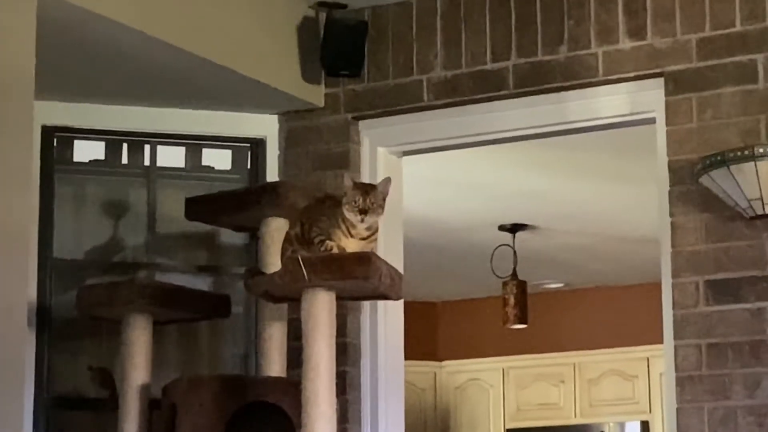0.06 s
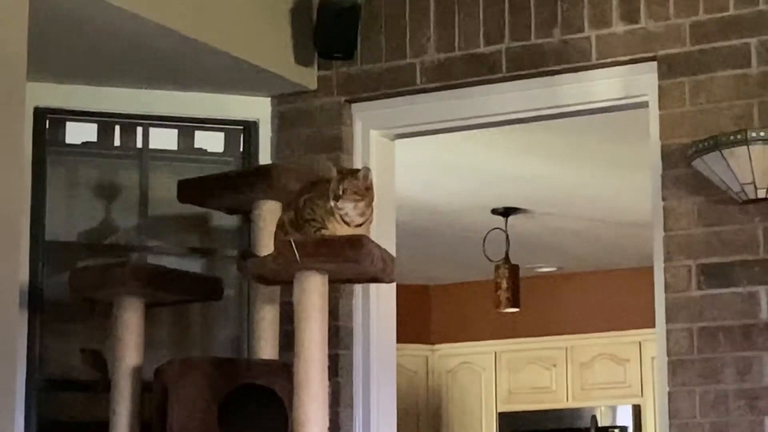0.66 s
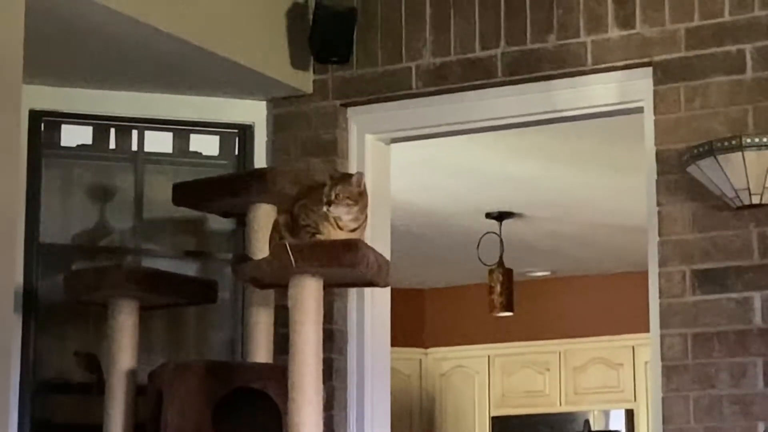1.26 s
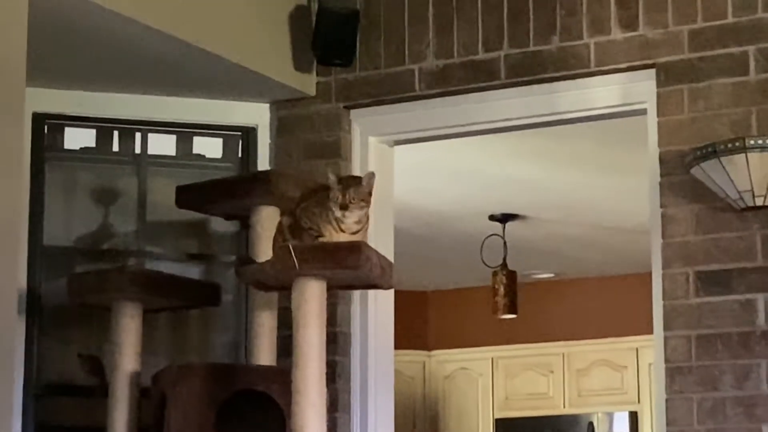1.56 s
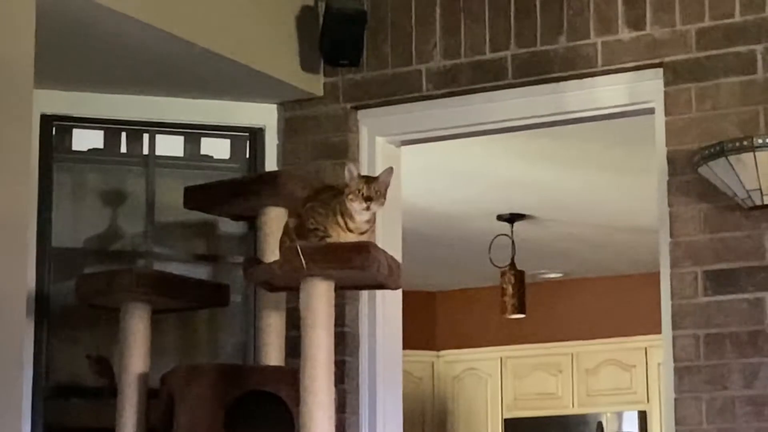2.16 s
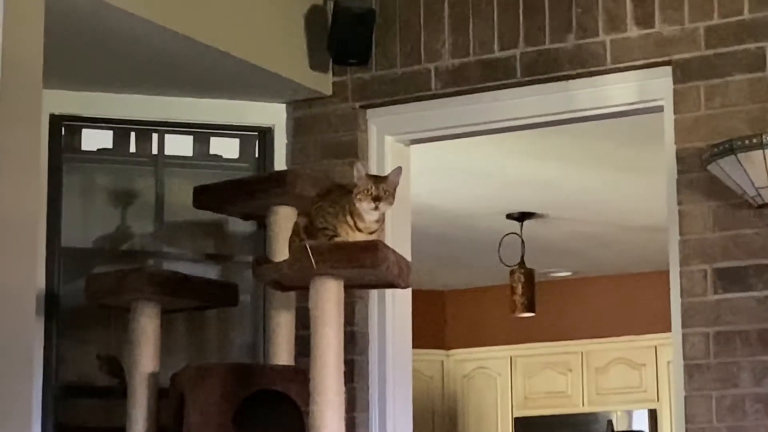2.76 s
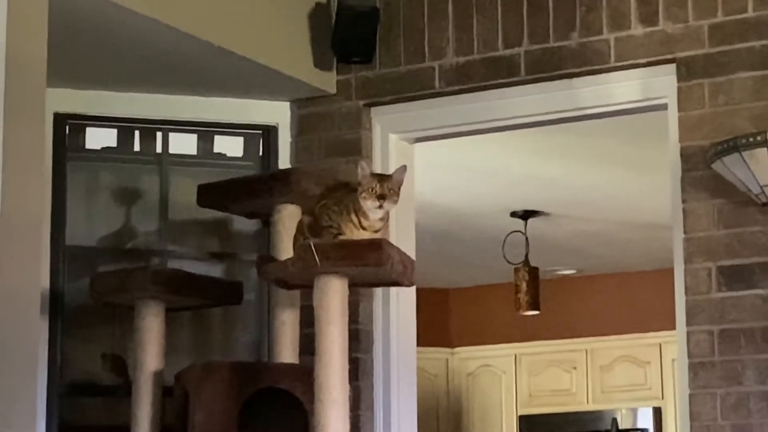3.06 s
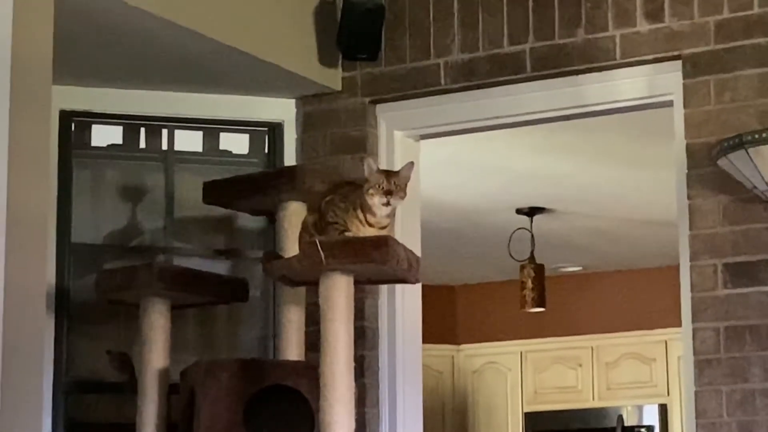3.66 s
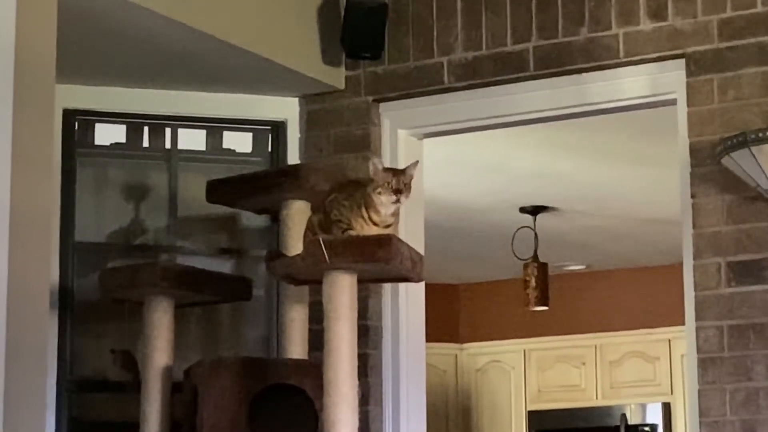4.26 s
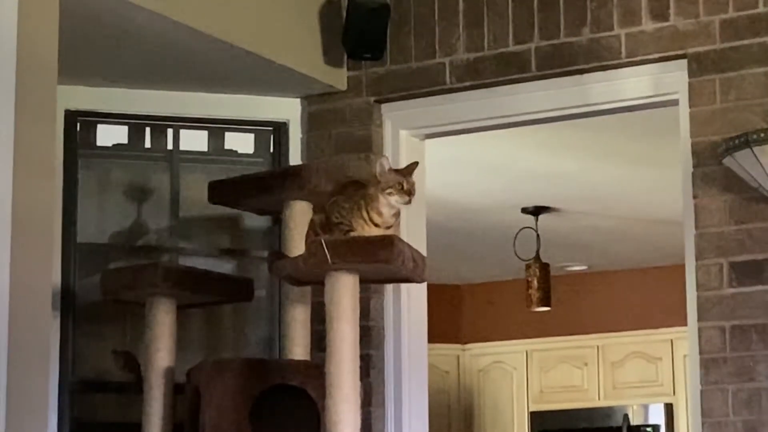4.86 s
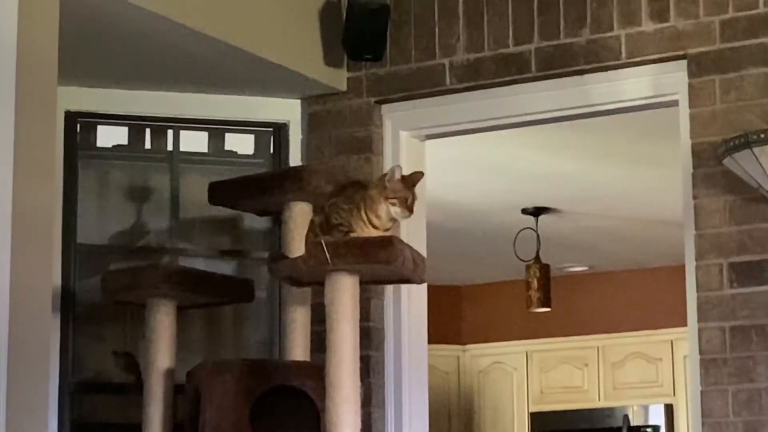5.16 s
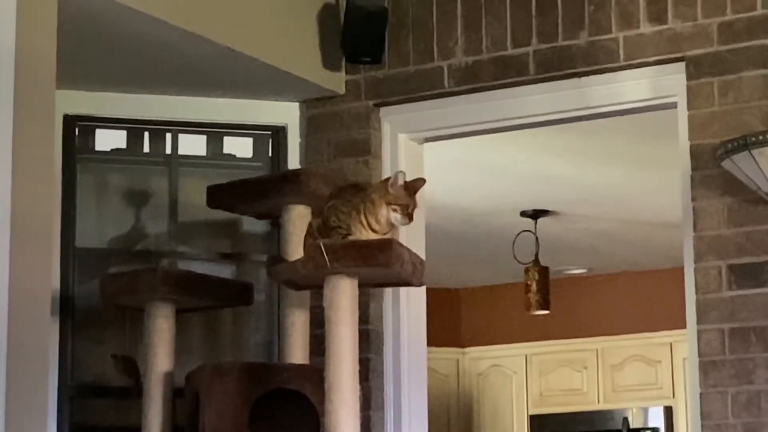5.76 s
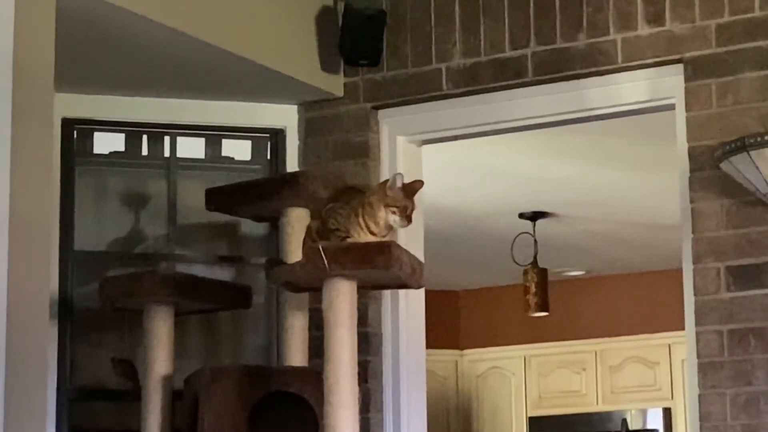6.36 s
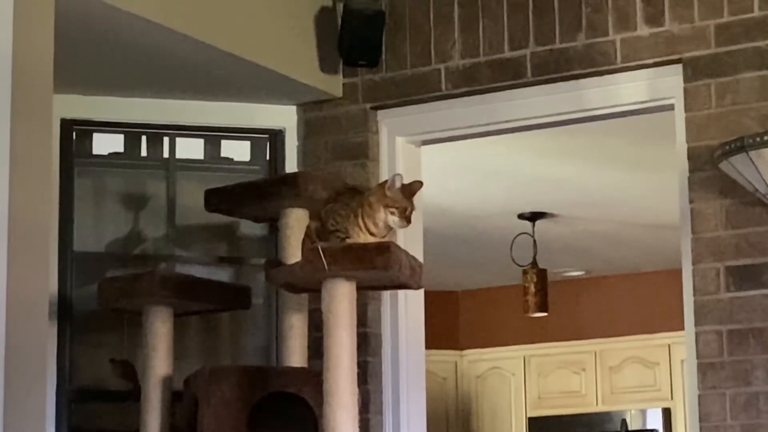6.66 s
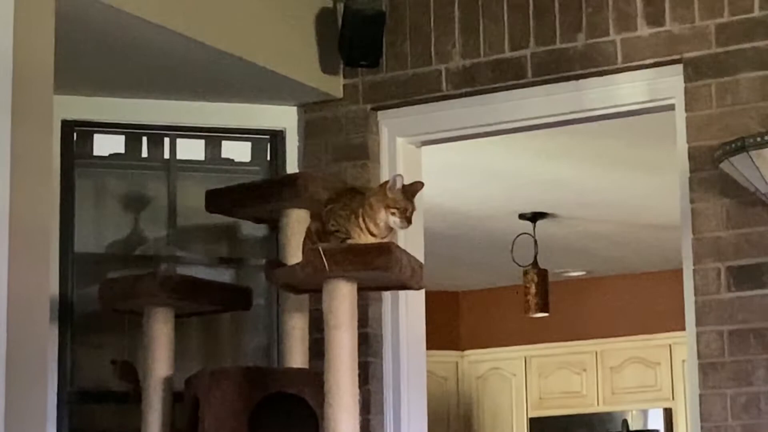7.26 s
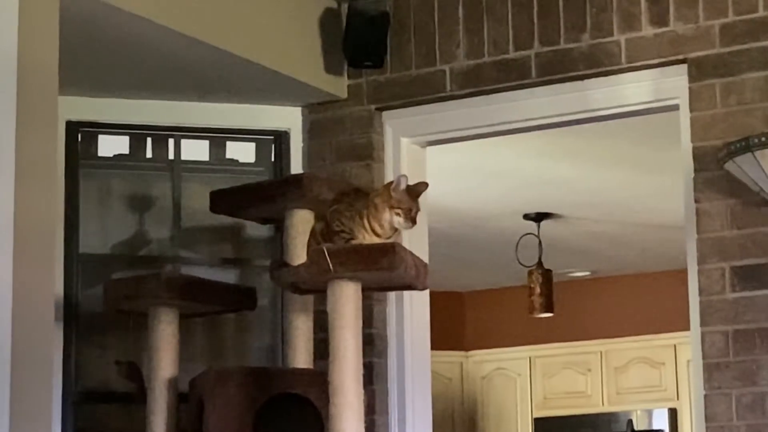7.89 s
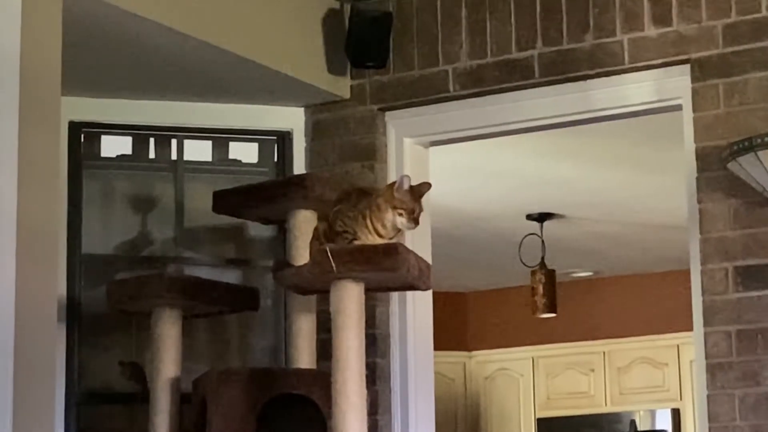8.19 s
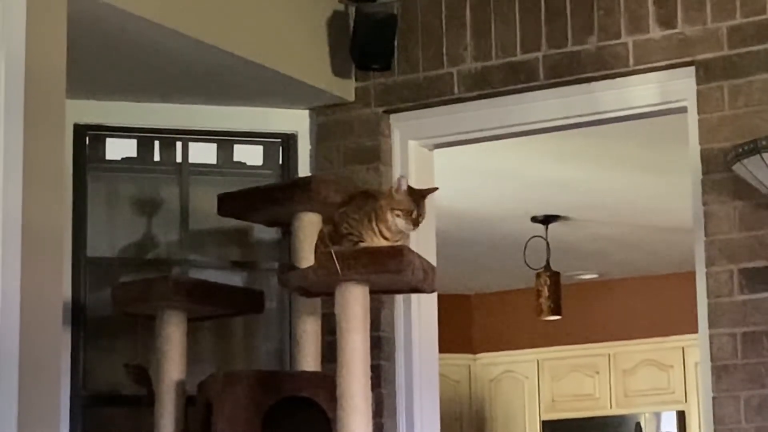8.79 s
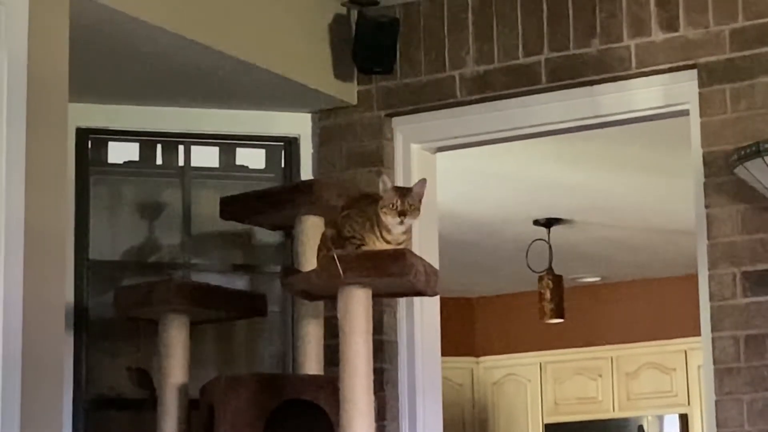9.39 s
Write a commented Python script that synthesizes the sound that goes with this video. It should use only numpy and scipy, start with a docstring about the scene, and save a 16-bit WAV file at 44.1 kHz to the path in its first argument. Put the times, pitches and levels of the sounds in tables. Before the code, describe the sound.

Five calls from a cat indoors, two faint and thin, three louder and long, over a soft household hum.

```python
"""A cat on a climbing tree calls five times, across a quiet living room from one microphone:
two thin, rising mews, then three full, drawn-out meows, the last with a break in the middle.
Its vocal folds make harmonics, shaped by mouth and throat; a call catches hoarsely, clears and frays.
Brick walls throw the calls back. Under them lie a low household hum and a few faint rustles and ticks."""
import sys
import numpy as np
from scipy import signal
from scipy.fft import rfft, irfft
from scipy.io import wavfile

SR = 44100
rng = np.random.default_rng(int(sys.argv[2]) if len(sys.argv) > 2 else 0)


def wav_out(sig):
    """Save sig, one row per channel (or a flat mono array), as 16-bit PCM at SR to the path in sys.argv[1]."""
    wavfile.write(sys.argv[1], SR, np.round(np.clip(np.atleast_2d(sig).T, -1, 1) * 32767).astype(np.int16))


N = 420273


def gain_of(db):
    """Decibels to amplitude."""
    return 10 ** (np.asarray(db) / 20)


def unit_rms(x):
    """Scales to an rms of one."""
    return x / np.sqrt(np.mean(x ** 2) + 1e-20)


def curve_at(points, hz):
    """Reads a curve on a log-frequency axis."""
    f, value = np.transpose(points)
    return np.interp(np.log(hz + 1), np.log(f + 1), value)


def add(mix, start_s, sound):
    """Mixes a sound in at its start time."""
    part = mix[round(start_s * SR):][:len(sound)]
    part += sound[:len(part)]


def band_noise(size, hz, width_hz):
    """Noise in one steep-sided resonance; centred on zero it is a slow wander."""
    f = np.fft.rfftfreq(size, 1 / SR)
    return unit_rms(irfft(rfft(rng.standard_normal(size)) / (1 + (2 * (f - hz) / width_hz) ** 2), size))


def household(air_db=-59.75, low_cut_hz=42, top_hz=17000):
    """Room tone at the microphone: steady air noise with three low, wavering hums."""
    # Colour of the air noise. Each row: frequency in Hz, relative level in dB.
    air_colour = [(15, -76.5), (25, -34.5), (41, -20), (69, -2.5), (99, -3), (152, -15), (183, -9),
                  (289, -5), (322, -10), (469, -12), (523, -12), (871, -15.5), (2420, -31), (3630, -30.5),
                  (15500, -41)]
    # The hums. Each row: centre in Hz, width in Hz, level in dB.
    hums = [(64, 9.7, -66.5), (91.6, 15, -73), (270, 34, -71.5)]
    hz = np.fft.rfftfreq(N, 1 / SR)
    band = hz ** 2 / np.hypot(hz ** 2, low_cut_hz ** 2) / np.hypot(1, (hz / top_hz) ** 2)
    colour = gain_of(curve_at(air_colour, hz)) * band
    air = gain_of(air_db) * unit_rms(irfft(rfft(rng.standard_normal(N)) * colour, N))
    return air + sum(gain_of(db) * band_noise(N, centre, width) for centre, width, db in hums)


def rustles(width_hz=950):
    """Faint puffs of noise that swell quickly and fade."""
    # Each row: start in seconds, level in dB, centre in Hz, length in seconds.
    puffs = [(0.206, -64, 3600, 0.067), (2.5, -74.5, 3130, 0.17), (2.634, -68, 4000, 0.041),
             (3.271, -64.5, 4180, 0.059), (3.47, -69.5, 2900, 0.098), (7.632, -62, 3540, 0.039),
             (7.854, -72.5, 4360, 0.12), (9.213, -72.5, 4840, 0.08), (9.315, -71, 4600, 0.027)]
    out = np.zeros(N)
    for start, db, hz, length in puffs:
        size = int(length * SR)
        swell = np.sin(np.pi * np.linspace(0, 1, size) ** 0.54)
        add(out, start, gain_of(db) * band_noise(size, hz, width_hz) * swell)
    return out


def ticks(rise_s=0.0015, decay_s=0.015):
    """Small ticks and taps: broad noise that starts sharply and dies quickly."""
    # Each row: start in seconds, level in dB, centre in Hz.
    taps = [(0.223, -67, 11500), (.96, -68, 12000), (2.258, -66.5, 7700), (2.661, -65, 4000),
            (2.925, -60, 1380), (3.273, -67, 5200), (3.536, -70, 10500), (4.647, -63, 8800),
            (5.569, -70, 7530), (5.66, -72.5, 6730), (5.84, -69.5, 6900), (6.12, -73, 9000),
            (6.281, -71, 9500), (6.326, -68, 8800), (7.379, -63.5, 5230), (9.35, -66, 5200)]
    out = np.zeros(N)
    t = np.arange(SR // 10) / SR
    envelope = np.minimum(t / rise_s, 1) * np.exp(-t / decay_s)
    for start, db, hz in taps:
        add(out, start, gain_of(db) * band_noise(len(t), hz, width_hz=0.66 * hz) * envelope)
    return out


def hoarseness(t, at_start, clear_s, at_end, floor=0.039, fray_s=0.12):
    """Roughness from 0 to 1 over a call: hoarse until the folds catch, then clear, then fraying."""
    catch = at_start / (1 + (t / clear_s) ** 6)
    fray = at_end * np.exp((t - t[-1]) / fray_s)
    return np.clip(floor + catch + fray, 0, 1)


def vowel(order, hz, mouth_hz, width_hz, body_db, tilt_db_per_octave, cut_order=2.9):
    """The mouth resonance rises as the jaw opens, lifting the harmonic it meets, dulling those above."""
    # Colour of every call's low harmonics. Each row: frequency in Hz, gain in dB.
    low_colour = [(500, 1.5), (590, 2.8), (690, 3.8), (760, .5), (880, 0), (1000, 0), (1100, -8),
                  (1240, .2), (1480, 4.5), (1680, 2), (1820, .5), (2030, -.5), (2240, -17), (2370, -6),
                  (2480, 1.5), (2800, 0)]
    harmonic_hz = order * hz
    peak = 1 / (1 + (2 * (harmonic_hz - mouth_hz) / width_hz) ** 2)
    dulling = np.hypot(1, (harmonic_hz / mouth_hz) ** cut_order)
    body = gain_of(body_db + tilt_db_per_octave * np.log2(order)) / dulling
    return np.hypot(peak, body) * gain_of(curve_at(low_colour, harmonic_hz))


def call(course, throat, mouth, hoarse, arch, rasp_db, rasp_slope, skirt_hz, release_s, rise_s=0.0032):
    """The vocal folds make a stack of harmonics; when hoarse, their cycles vary in length and strength."""
    times, *columns = np.transpose(course)
    t = np.arange(times[0], times[-1], 1 / SR)
    size = len(t)
    hz, effort_db, mouth_hz, high_db = (np.interp(t, times, column) for column in columns)
    rough = hoarseness(t - t[0], *hoarse)
    order = np.arange(1, 25)[:, None]
    lower, upper = order[:4], order[4:]
    # The mouth shapes the lowest harmonics; all but the fundamental flutter.
    flutter_db = 1.74 * np.log2(lower) * np.array([band_noise(size, 0, 20) for _ in lower])
    low = gain_of(effort_db + flutter_db) * vowel(lower, hz, mouth_hz, *mouth)
    # The overtones slide through the throat's resonances, which arch scales at start, middle and end.
    stretch = np.polyval(np.polyfit([0, 0.5, 1], arch, 2), np.linspace(0, 1, size))
    flutter_db = 3.5 * np.array([band_noise(size, 0, 30) for _ in upper])
    high = gain_of(curve_at(throat, upper * hz / stretch) + flutter_db)
    high *= gain_of(high_db) / np.linalg.norm(high, axis=0)
    strength = np.vstack([low, high])
    jitter = 0.045 * rough * band_noise(size, 0, 320)
    waver = 0.0033 * band_noise(size, 0, 55)
    cycles = np.cumsum(hz * (1 + jitter + waver)) / SR
    phase = 2 * np.pi * (order * cycles + rng.random(order.shape))
    # Turbulence at the folds spreads a skirt of noise around each harmonic, more around the high ones.
    skirts = np.array([band_noise(size, 0, skirt_hz) for _ in order])
    rasp = gain_of(rasp_db) * np.sqrt(rough) * order ** rasp_slope
    stack = np.sqrt(2) * strength * (np.sin(phase) + rasp * skirts * np.cos(phase)) / np.hypot(1, rasp)
    shimmer = 1 + 0.2 * rough * band_noise(size, 0, 380)
    envelope = np.clip((t - times[0]) / rise_s, 0, 1) * np.clip((times[-1] - t) / release_s, 0, 1)
    out = np.zeros(N)
    add(out, times[0], stack.sum(0) * shimmer * envelope)
    return out


def mews():
    """Two thin, rising calls, airy with turbulence at the folds."""
    # The course of each mew. Each row: time in seconds, pitch in Hz, effort in dB,
    # mouth resonance in Hz, relative level of the overtones in dB.
    first = [(0.29, 502, -57, 410, -81), (0.42, 557, -55, 666, -99), (0.6, 608.7, -52, 920, -75.6),
             (0.76, 666, -55.5, 1360.0, -88), (0.86, 665.5, -43.5, 1730, -81),
             (0.918, 689, -53.6, 1630.0, -80), (0.936, 817, -63, 1957, -81), (0.974, 892, -55, 700.0, -86),
             (1.02, 940, -75, 850.0, -84.6)]
    second = [(3.54, 720, -61, 1430.0, -67), (3.572, 573, -47, 930.0, -77),
              (3.64, 515.0, -45.5, 900.0, -76), (3.71, 552.4, -45, 1070, -76),
              (3.79, 630.6, -43, 1540.0, -68.2), (3.854, 639.8, -41.5, 1690, -66),
              (3.95, 638.2, -45.5, 1480, -65.3), (4.07, 652, -51, 1400, -66.9),
              (4.14, 699, -57, 1745, -68.5), (4.24, 837, -73, 1520.0, -88)]
    # The throat's resonances. Each row: frequency in Hz before the arch, relative level in dB.
    throat = [(2800, -9), (3300, -5), (3900, -14), (4500, 9), (5150, -2), (5800, 16), (6500, -5),
              (8000, -6), (10500, -23), (12500, -12), (14500, -20)]
    airy = dict(rasp_db=-30, rasp_slope=1.7, skirt_hz=750, release_s=0.013)
    out = call(first, throat, mouth=(530, -33, -3.2), hoarse=(0.546, 0.385, 0.31),
               arch=(0.58, 0.56, 0.48), **airy)
    out += call(second, throat, mouth=(636, -44, -2.9), hoarse=(0.51, 0.2, 0.82),
                arch=(0.61, 0.94, 0.81), **airy)
    return gain_of(-1.35) * out


def meows():
    """Three full calls, the jaw opening and closing; the last breaks into two parts."""
    # The course of each meow or part. Each row: time in seconds, pitch in Hz, effort in dB,
    # mouth resonance in Hz, relative level of the overtones in dB.
    first = [(1.255, 523, -47.5, 1150, -79), (1.285, 554, -47, 1070, -73), (1.322, 472, -43.5, 1010, -58),
             (1.347, 506, -32.5, 980, -50), (1.363, 636.4, -38.5, 1510, -61), (1.395, 639, -36, 2050, -58),
             (1.47, 617, -37.5, 2200, -60.5), (1.61, 624.2, -39, 2080, -57),
             (1.69, 603.8, -35, 1274, -53.5), (1.8, 633, -35.5, 924, -62.5), (1.885, 702, -35, 670, -68),
             (1.98, 761, -41.5, 696, -70)]
    second = [(4.65, 768, -39, 1070, -65), (4.68, 740, -26, 1040, -54.5), (4.77, 753, -29.5, 1460, -51.5),
              (4.8, 710, -30.5, 1450, -50), (4.844, 664.3, -31.5, 2540, -53.5),
              (4.92, 638.8, -38, 2004, -57), (5.07, 587.3, -32, 1393, -55), (5.19, 582.7, -31, 1153, -57.5),
              (5.26, 617.7, -32, 820, -71.5), (5.395, 700, -27.5, 678, -67),
              (5.444, 768, -33.5, 954, -71.5), (5.48, 742, -45.5, 670, -72)]
    before_break = [(8.275, 734, -32, 2600, -63), (8.31, 677.5, -27.5, 2170, -46),
                    (8.381, 681, -29.5, 2140, -44.5), (8.42, 644.3, -32, 1420, -47),
                    (8.5, 619.2, -29, 1176, -53), (8.525, 632.5, -27, 1110, -62),
                    (8.552, 543, -30.5, 710, -62)]
    after_break = [(8.582, 684, -25.5, 750, -66), (8.612, 608.3, -29, 1730.0, -50),
                   (8.66, 602.4, -30, 1860, -49), (8.74, 588.2, -34.5, 1800, -53),
                   (8.8, 575, -30.5, 1264, -59.6), (8.86, 580.2, -30, 1177, -60.5),
                   (8.92, 580.5, -31, 940, -68), (9.012, 609.4, -31.5, 785, -73),
                   (9.054, 665.7, -30, 740, -75), (9.1, 666.5, -29.5, 685, -76),
                   (9.19, 685, -43, 600.0, -87)]
    # The throat's resonances in each. Each row: frequency in Hz before the arch, relative level in dB.
    first_throat = [(2700, 12), (3080, -3.5), (3400, 1), (3700, -2.5), (4300, -20), (4950, -13.5),
                    (5550, -12), (6150, -28), (6800, -23), (7400, -17.5), (8100, -33), (12000, -51)]
    second_throat = [(2900, 0.5), (3200, -1.5), (3550, 6), (4100, -9.5), (4600, -20), (5000, -11),
                     (5600, -20), (6400, -34.5), (7050, -17.5), (7800, -25.5), (12000, -42)]
    before_throat = [(3100, 8), (3400, 3.5), (4080, -7.5), (4700, -21.5), (5400, -17), (6120, -18.5),
                     (6700, -41), (7600, -26.5), (8200, -28), (10000, -37), (14000, -47)]
    after_throat = [(3000, 2.5), (3620, -0.5), (4200, -12.5), (4800, -16), (5420, -8.5), (6000, -34),
                    (6650, -21.5), (7700, -23), (8500, -20), (10000, -29), (11500, -43), (14000, -39.5)]
    full = dict(rasp_db=-28, rasp_slope=1.52, skirt_hz=450, release_s=0.0054)
    out = call(first, first_throat, mouth=(456, -3.3, -10.5), hoarse=(0.36, 0.14, 0.3),
               arch=(0.94, 1.028, 1.15), **full)
    out += call(second, second_throat, mouth=(136, -6, -1.5), hoarse=(0.85, 0.031, 0.081),
                arch=(1.05, 0.98, 1.2), **full)
    out += call(before_break, before_throat, mouth=(200, -7, -0.27), hoarse=(0.2, 0.035, 0.022),
                arch=(1.02, 0.97, 0.67), **full)
    out += call(after_break, after_throat, mouth=(153, -6.5, -2.5), hoarse=(0.25, 0.032, 0.022),
                arch=(1.033, 1.02, 1.48), **full)
    return gain_of(-0.4) * out


def brick_walls(direct, echoes_per_s=2500, first_echo_s=0.0085, early_decay_s=0.01):
    """Sparse echoes, each band dying at its own speed; the nearest walls answer loudest."""
    # The room's decay. Each row: frequency in Hz, seconds to fall 60 dB.
    decay_times = [(250, 0.12), (700, 0.36), (1500, 0.39), (4000, 0.37), (10000, 0.14)]
    # How strongly the walls answer. Each row: frequency in Hz, relative level in dB.
    wall_colour = [(300, -11.5), (600, -5), (750, 2), (1300, 0), (2200, -2), (4000, 0.5), (10000, -0.5)]
    delay = np.arange(SR) / SR
    echoes = rng.choice([-1., 1.], SR) * (rng.random(SR) < echoes_per_s / SR) * (delay > first_echo_s)
    echoes *= 1 + gain_of(-10) * np.exp(-delay / early_decay_s)
    hz, t, bands = signal.stft(echoes, SR, nperseg=256)
    fall_db = -60 * t / curve_at(decay_times, hz)[:, None]
    bands *= gain_of(fall_db + curve_at(wall_colour, hz)[:, None])
    tail = signal.istft(bands, SR, nperseg=256)[1]
    return signal.fftconvolve(direct, tail / np.linalg.norm(tail))[:N]


def scene(walls_db=-6):
    """Cat, rustles and ticks reach the microphone directly and off the walls, over the room tone."""
    direct = mews() + meows() + rustles() + ticks()
    return (direct + gain_of(walls_db) * brick_walls(direct) + household())[None]


def record(dry, edge_hz=15680):
    """The recorder's band limit cuts off the top treble."""
    lowpass = signal.firwin(511, edge_hz, window=("kaiser", 9), fs=SR)
    return signal.oaconvolve(dry, lowpass[None], "same")


dry = scene()
out = record(dry)
wav_out(out)
```